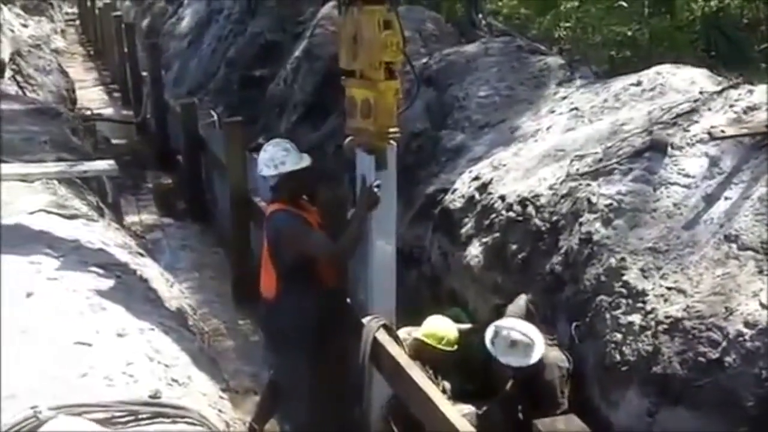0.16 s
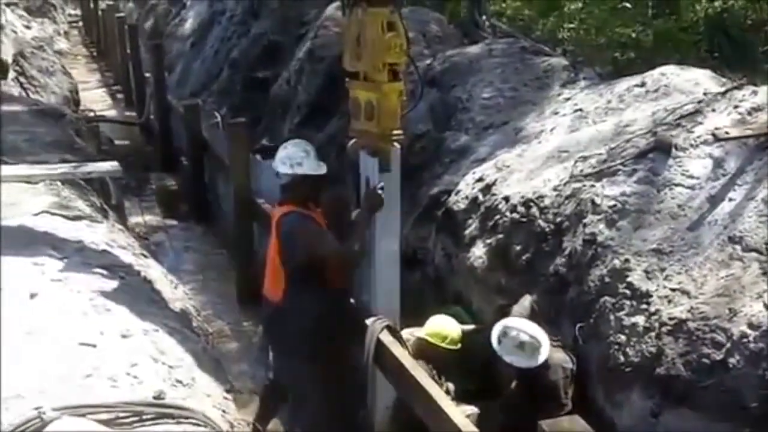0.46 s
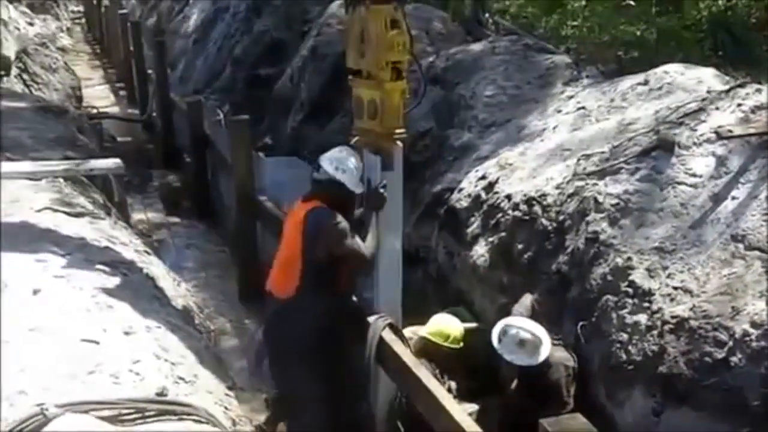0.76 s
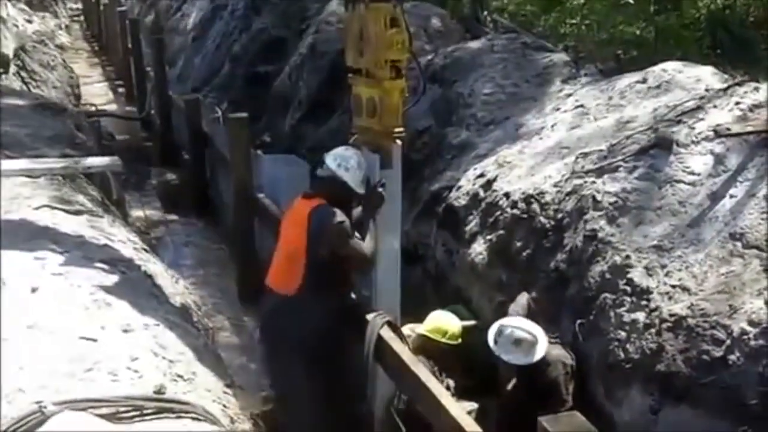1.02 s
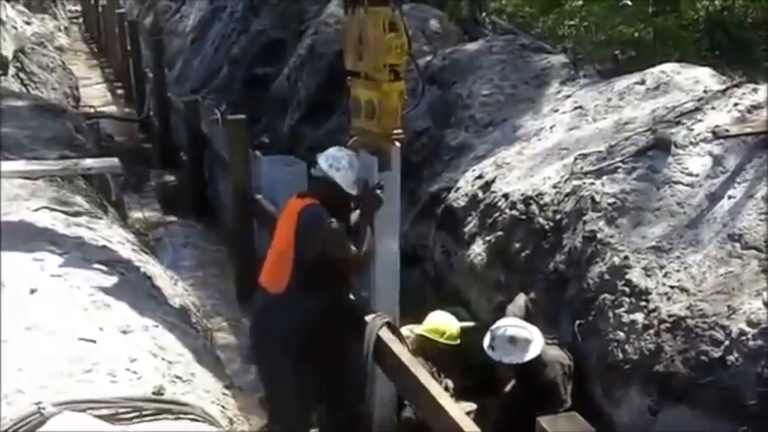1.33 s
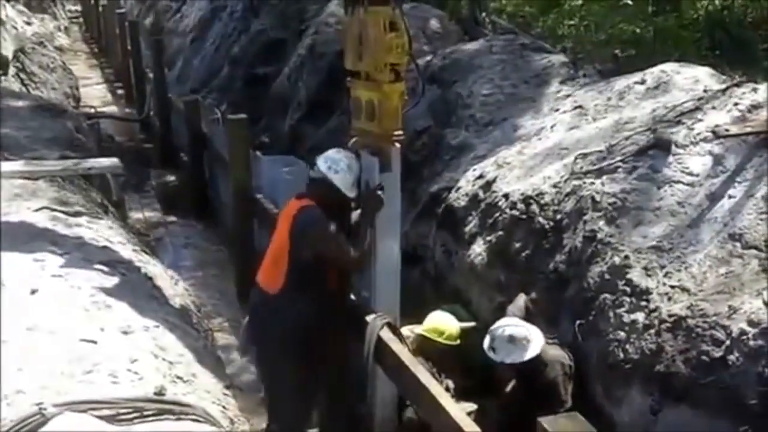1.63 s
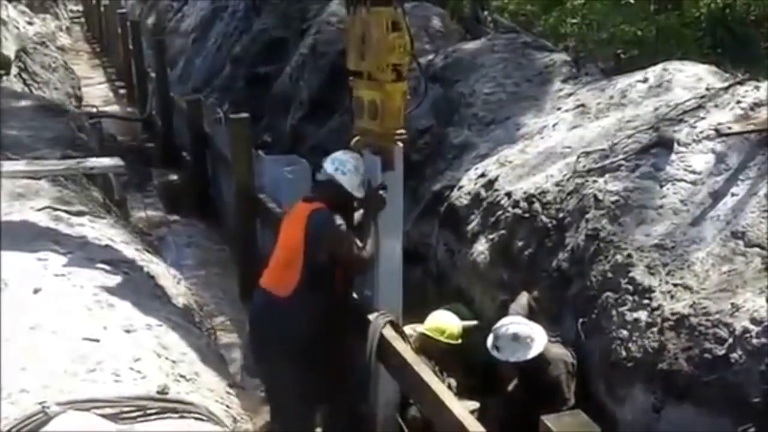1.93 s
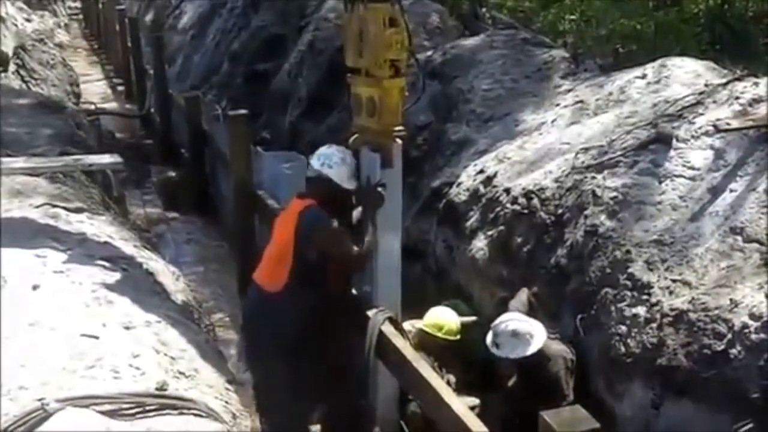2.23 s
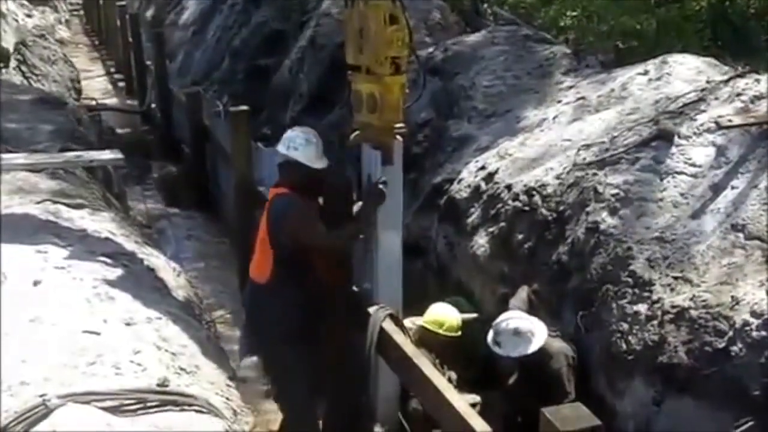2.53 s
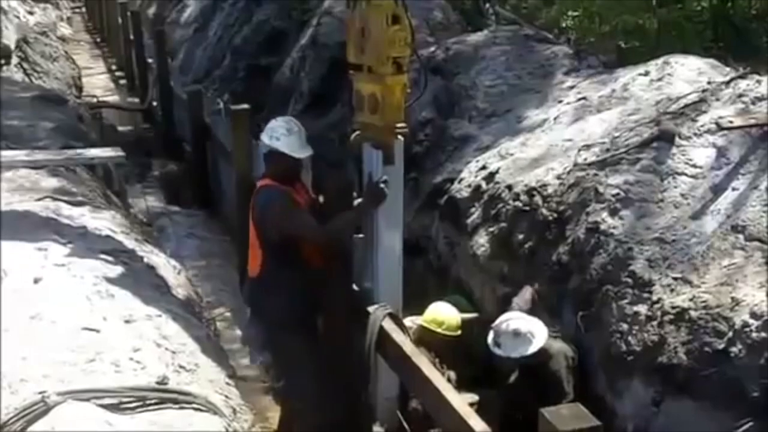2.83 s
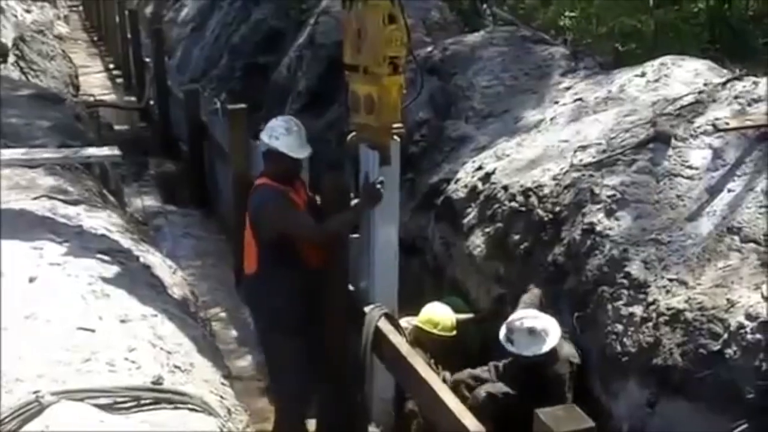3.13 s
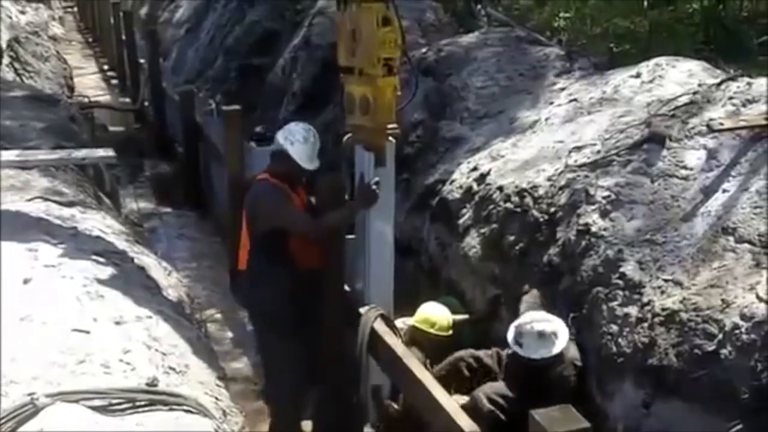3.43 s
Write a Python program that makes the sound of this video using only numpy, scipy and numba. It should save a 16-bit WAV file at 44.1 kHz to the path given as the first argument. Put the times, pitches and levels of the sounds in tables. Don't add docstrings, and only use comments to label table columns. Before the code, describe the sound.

A single-cylinder pump engine chugs fast beside an outdoor trench, surging about twice a second, with sharp exhaust barks, steady engine hum and fan roar, steel clanks, rattling guards and wind rumble on a small mono microphone.

```python
import sys
import numpy as np
from scipy import signal
from scipy.fft import rfft, irfft
from scipy.io import wavfile
from scipy.ndimage import uniform_filter1d
from numba import njit

SR = 44100
rng = np.random.default_rng(int(sys.argv[2]) if len(sys.argv) > 2 else 0)


def master(y):
    cut = np.clip(np.atleast_2d(y).T, -1, 1)
    pcm = np.round(cut * 32767)
    wavfile.write(sys.argv[1], SR, pcm.astype(np.int16))


def nominal_scale(level):
    x = np.asarray(level, float) / 20
    return 10 ** x


N = 157437

FLICKER_DB = .9


@njit
def svf(x, hz, width_hz):
    y, band, low = np.empty(len(x)), 0., 0.
    g, k = np.tan(np.pi * hz / SR), width_hz / hz
    for i in range(len(x)):
        v = (band + g * (x[i] - low)) / (1 + g * (g + k))
        band = 2 * v - band
        low = low + 2 * g * v
        y[i] = k * v
    return y


def ring(x, hz, width_hz):
    once = svf(1. * x, 1. * hz, 0.99 * width_hz)
    return svf(once, 1. * hz, 0.99 * width_hz)


def level(x, db):
    return x * nominal_scale(db) / np.sqrt(np.mean(x ** 2))


def ringing_noise(hz, width_hz, db):
    return level(ring(rng.standard_normal(N), hz, width_hz), db)


def walk(rate_hz):
    hold = int(SR / rate_hz)
    steps = np.repeat(rng.standard_normal(N // hold + 1), hold)
    return 1.5 * uniform_filter1d(uniform_filter1d(steps, hold), hold)[:N]


def barks():
    # start in seconds, peak level in dB.
    hard_firings = [(.0129, -19), (.0922, -21), (.2181, -22), (.6976, -13), (.742, -14), (.7854, -15.5),
                    (.8453, -20), (1.1355, -22), (1.2487, -20), (1.3448, -21), (1.4369, -20), (1.7803, -20),
                    (1.8645, -21), (1.9214, -18), (2.3004, -20), (2.343, -15), (2.441, -20), (2.7805, -22),
                    (2.8615, -18), (2.9441, -18), (3.3336, -17), (3.377, -17), (3.4212, -17), (3.4648, -21),
                    (3.5061, -16.5)]
    pipe_hz, width_hz = 258, 155
    puffs, one_puff = np.zeros(N), np.zeros(999)
    one_puff[0] = 1
    for s, db in hard_firings:
        puffs[int(s * SR)] = nominal_scale(db)
    return ring(puffs, pipe_hz, width_hz) / np.max(ring(one_puff, pipe_hz, width_hz))


def exhaust_echoes(near):
    # delay in seconds, signed gain.
    reflections = [
        (.0143, -.65),
        (.0286, .35),
    ]
    return near + sum(gain * np.roll(near, int(s * SR)) for s, gain in reflections)


def pump(t):
    # time in seconds, effort in dB.
    strokes = [
        (.27, 4.5),
        (.75, 2.5),
        (1.33, 1.5),
        (1.85, 6),
        (2.37, 3.5),
        (2.9, 4.5),
        (3.4, 0.9),
    ]
    # multiple of firing rate, level in dB, rise under load in dB, lag in seconds.
    thump = [(1, -40, 3, 0), (2, -32.5, 5, .0005), (3, -41, 5, .004)]
    # centre in Hz, width in Hz, level in dB, rise under load in dB,
    # strongest point as share of a stroke.
    exhaust = [(218.8, 45, -46.5, 7, 0.57), (247.7, 42, -47, 3.5, 0.7), (313.5, 60, -49, 6.5, 0.61),
               (364, 13, -52, 4.5, 0.72)]
    silencer = (130.5, 12.5, -43.5, 9, 1.4)
    # centre in Hz, width in Hz, level in dB, rise under load in dB,
    # fade as share of a cycle, blows per cycle.
    clatter = [(267, 135, -38.5, 3, 0.27, 1), (915, 820, -38.5, -8, 0.22, 1), (1430, 860, -48, -4, 0.21, 2),
               (2800, 990, -60.5, 6, 0.2, 2), (4170, 2400, -62.5, 2, 0.16, 1),
               (6630, 3900, -66.5, 6.5, 0.3, 1)]
    stroke_hz, firings, first_firing_s = 1.924, 13, .015
    slowing_share, lag_s, jitter_s = .71, .0103, .0004
    load_at, load_width, hiss_late = 0.42, 0.4, 0.07
    scatter_db, clatter_scatter_db, clatter_lead_s = 1.2, 1.8, 0.0033

    count = np.arange(-firings, 8 * firings)
    share = count % firings / firings
    time_chance, kick_chance, clatter_chance = rng.standard_normal((3, len(count)))
    even_s = first_firing_s + count / firings / stroke_hz
    when_s = even_s + np.interp(share, [0, slowing_share, 1], [0, lag_s, 0])
    turns = np.interp(t, when_s + jitter_s * time_chance, count)

    def push(at):
        off = (turns / firings - at + .5) % 1 - .5
        return np.exp(-(off / load_width) ** 2)

    load = push(load_at)
    effort_db = load * np.interp(t, *np.array(strokes).T)

    out = 0
    for k, db, rise_db, late_s in thump:
        wave = np.cos(2 * np.pi * k * np.interp(t - late_s, t, turns))
        out = out + np.sqrt(2) * nominal_scale(db + rise_db * load + effort_db / 2) * wave

    cycle = np.floor(turns).astype(int) + firings
    kicks = np.diff(cycle, prepend=cycle[0]) * nominal_scale(scatter_db * kick_chance[cycle])

    def pipe(hz, width_hz, db, rise_db, at):
        return nominal_scale(rise_db * push(at) + effort_db) * level(ring(kicks, hz, width_hz), db)

    near = exhaust_echoes(sum(pipe(*row) for row in exhaust) + barks())

    early = np.interp(t + clatter_lead_s, t, turns)
    late_load = push(load_at + hiss_late)
    for hz, width_hz, db, rise_db, fade, blows in clatter:
        beat = round(blows) * early + 40
        blow = np.arange(400)
        shared = clatter_chance[(blow // round(blows)) % len(count)]
        size_db = clatter_scatter_db * (0.97 * rng.standard_normal(400) + 0.44 * shared)
        gate = np.exp(-(beat % 1) / fade) * nominal_scale(size_db[beat.astype(int)])
        struck = level(ring(gate * rng.standard_normal(N), hz, width_hz), db)
        near = near + nominal_scale(rise_db * late_load + effort_db) * struck
    return out + near + pipe(*silencer)


def bands(shape, step, db, swell_db):
    log_hz, gain_db = np.log(np.array(shape)[:, 0]), np.array(shape)[:, 1]
    out = 0
    for hz in np.exp(np.arange(log_hz[0], log_hz[-1], step)):
        width_hz = 1.9 * step * hz
        band = svf(svf(rng.standard_normal(N), hz, width_hz), hz, width_hz)
        band_db = np.interp(np.log(hz), log_hz, gain_db) + swell_db + FLICKER_DB * walk(9.1)
        out = out + nominal_scale(band_db) * band
    return level(out, db)


def fans():
    # frequency in Hz, level in dB per Hz.
    roar = [(25, -15.5), (60, -5), (150, -1), (300, -6), (450, -14.5), (850, -11), (2600, -24), (5000, -36)]
    # centre in Hz, width in Hz, level in dB.
    panels = [(837, 63, -44), (972, 66, -45), (1033, 50, -48.5), (1181.6, 44, -47), (1370, 390, -43),
              (2543, 610, -48)]
    # frequency in Hz, level in dB per Hz.
    hiss = [(5900, -6.5), (6500, -1), (7500, -4.5), (8300, 8.5), (10200, 7.5)]
    out = bands(roar, 0.3019, -29, .4 * walk(2.8))
    for hz, width_hz, db in panels:
        out = out + nominal_scale(FLICKER_DB * walk(5.4)) * ringing_noise(hz, width_hz, db)
    return out + bands(hiss, 0.074, -46.5, FLICKER_DB * walk(6))


def ground_dip(x):
    return x - .7 * svf(x, 348., 16.)


def orders(turns, table, wander_db):
    out = 0
    for k, db in table:
        phase_turns = rng.random() * (k > 5.5)
        gain = np.sqrt(2) * nominal_scale(db + wander_db * walk(3))
        out = out + gain * np.cos(2 * np.pi * (k * turns + phase_turns))
    return out


def steady_engine(t):
    # multiple of shaft rate, level in dB.
    engine_orders = [(1, -40), (2, -33), (3, -42), (4, -49), (5, -39), (6, -47), (9, -40), (10, -45),
                     (11, -50), (14, -46), (15, -56), (18, -51), (19, -56), (20, -54), (21, -52), (25, -57),
                     (28, -61), (41, -58)]
    return orders(28.256 * (t - .029), engine_orders, 0.14)


def generator(t):
    # multiple of shaft rate, level in dB.
    generator_orders = [(1, -36), (2, -33), (3, -56), (5, -53), (6, -56), (10, -58), (12, -51)]
    return -orders(55.454 * (t - .0134), generator_orders, 0.79)


def idler(t):
    # multiple of shaft rate, level in dB.
    idler_orders = [(1, -48), (2, -45), (4, -52), (5, -51)]
    return orders(18.14 * (t - .0446), idler_orders, .5)


def knocks(t, table, db_all, fade_s, width_hz):
    rise_s = .004
    noise = rng.standard_normal(N)
    out = 0
    for s, db, hz in table:
        burst = np.clip((t - s) / rise_s, 0, 1) * np.exp(-np.abs(t - s) / fade_s)
        out = out + burst * level(ring(noise, hz, width_hz), db + db_all)
    return out


def clanks(t):
    # start in seconds, peak level in dB, pitch in Hz.
    dull = [(0.014, -16.5, 966), (0.207, -25, 840), (0.343, -23.5, 840), (0.419, -20.5, 1020),
            (0.498, -21, 974), (0.659, -17.5, 760), (0.731, -24, 1310), (1.061, -22.5, 937),
            (1.138, -27.5, 1170), (1.405, -18.5, 886), (1.501, -21.5, 860), (1.66, -21, 960),
            (1.694, -18.5, 830), (1.868, -20, 942), (2.101, -22, 990), (2.165, -25.5, 860),
            (2.323, -17, 854), (2.543, -16, 960), (2.579, -18, 1000), (3.063, -21, 1075), (3.1, -16.5, 970),
            (3.137, -19, 926), (3.178, -20, 1020), (3.251, -22.5, 1030), (3.319, -19, 942),
            (3.427, -28, 1060)]
    # start in seconds, peak level in dB, pitch in Hz.
    light = [(0.0146, -23.5, 2610), (0.1145, -26.5, 2220), (0.595, -26, 2280), (0.7667, -23.5, 2670),
             (0.8081, -27.5, 2340), (0.9627, -27, 2390), (1.369, -27.5, 2430), (1.406, -30, 2300),
             (1.54, -34, 2290), (1.6776, -29, 2360), (1.9285, -30, 2380), (2.0822, -33, 2000),
             (2.2144, -29, 2680), (2.3253, -28, 2300), (2.374, -25.5, 1930), (2.528, -30, 2620),
             (2.58, -27.5, 2630), (2.776, -27.5, 1970), (2.9277, -29, 2370), (3.047, -27, 2420),
             (3.081, -26, 2380), (3.2949, -25, 2310), (3.4196, -36, 2680), (3.4885, -26, 2370)]
    return knocks(t, dull, -8.5, 0.015, 410) + knocks(t, light, -5, 0.0087, 810)


def wind(t):
    # centre in seconds, half length in seconds, level in dB.
    gusts = [
        (0.114, 0.026, -27),
        (0.51, 0.042, -35.5),
        (0.718, 0.17, -23),
        (2.132, 0.23, -32),
        (3.381, 0.14, -25.5),
    ]
    blow = sum(nominal_scale(db) * np.exp(-((t - s) / half_s) ** 2) for s, half_s, db in gusts)
    return blow * ringing_noise(57.4, 76, 0)


def rattles(t):
    # start in seconds, peak level in dB, thin top in dB relative to the peak.
    bursts = [(0.1747, -34.5, -19), (0.696, -31, -31), (0.7307, -28.5, -15), (0.775, -26.5, -12),
              (0.818, -37, -9), (0.859, -32.5, -9), (1.5733, -30.5, -14), (1.738, -32, -24),
              (1.78, -36, -20), (1.8537, -32, -14), (2.334, -33.5, -10), (2.375, -29, -17),
              (2.416, -33, -14), (2.61, -36.5, -18), (2.7761, -32, -13), (2.8509, -43.5, -18),
              (2.8916, -31.5, -10.5), (3.1334, -27.5, -16.5), (3.415, -32, -13), (3.455, -35.5, -23),
              (3.4979, -33, -14), (3.538, -33.5, -11)]
    fade_s, body_db, top_rise_db = .014, -10.5, 8.5
    body, top = 0, 0
    for s, db, rel_db in bursts:
        fade = (t > s) * np.exp(-np.abs(t - s) / fade_s)
        body = body + nominal_scale(db) * fade
        top = top + nominal_scale(db + rel_db) * fade
    sheet = ringing_noise(3630, 2300, body_db)
    tinkle = ringing_noise(6640, 2300, body_db + top_rise_db)
    return body * sheet + top * tinkle


def scene():
    t = np.arange(N) / SR
    mid = ground_dip(pump(t) + fans())
    mid = mid + steady_engine(t) + generator(t) + idler(t)
    mid = mid + clanks(t) + wind(t) + rattles(t)
    return np.array([mid, mid])


def patchy_treble(x):
    # frequency in Hz, share kept.
    survive = [(4850, 1), (5000, .5), (5170, 0), (5800, 0), (5950, .2), (6100, .9), (6500, 1), (7400, .75),
               (7650, .13), (8350, .08), (8500, .018), (9100, .025), (9600, .008), (9900, .003),
               (10050, .04), (10170, .04), (10200, 0)]
    size, hop, lead = 4096, 2048, 260
    hz, _, z = signal.stft(np.pad(x, (lead, 0)), SR, "cosine", size, hop)
    loud_db = 10 * np.log10(uniform_filter1d(np.abs(z) ** 2, size=120, axis=0) + 1e-18)
    merit = rng.standard_normal(z.shape) + .13 * (loud_db - loud_db.mean(axis=1, keepdims=True))
    order = np.argsort(np.argsort(-merit, axis=1), axis=1)
    rank = (order + rng.random((len(hz), 1))) / z.shape[1]
    share = np.interp(hz, *np.array(survive).T)[:, None]
    return signal.istft(z * (rank < share), SR, "cosine", size, hop)[1][lead:N + lead]


def low_pass(x):
    return signal.sosfilt(signal.butter(12, 10250, fs=SR, output="sos"), x)


def record(dry):
    mid = patchy_treble(dry[0]) + .0019
    bass = np.arange(N // 2 + 1) * SR / N < 75
    side = nominal_scale(-33.5) * irfft(rfft(mid) * bass, N)
    return low_pass(np.array([mid + side, mid - side]))


dry = scene()
out = record(dry)
master(out)
```